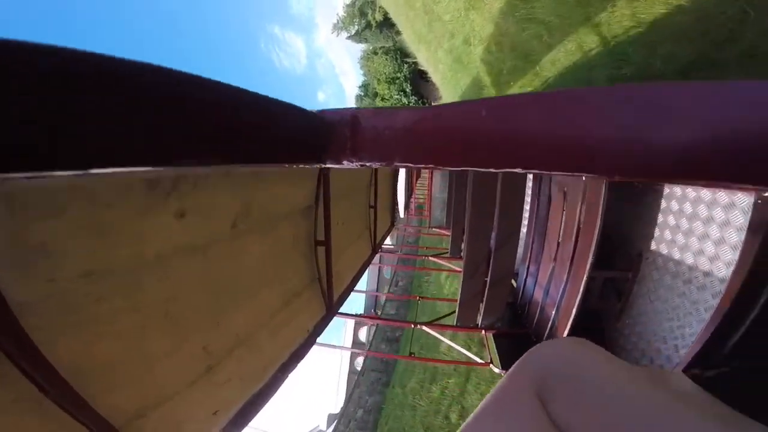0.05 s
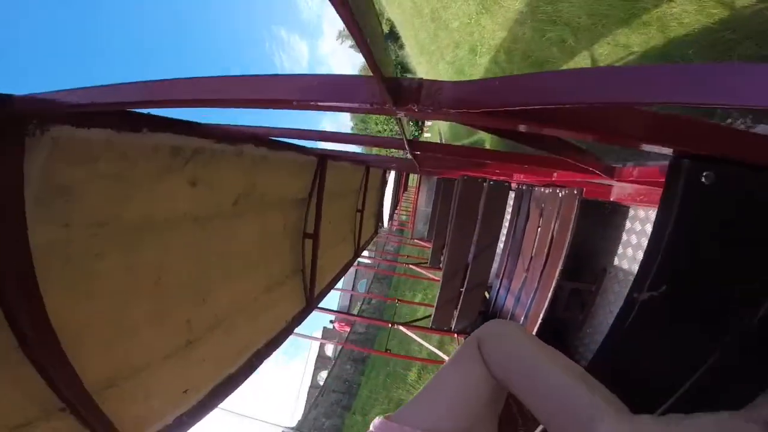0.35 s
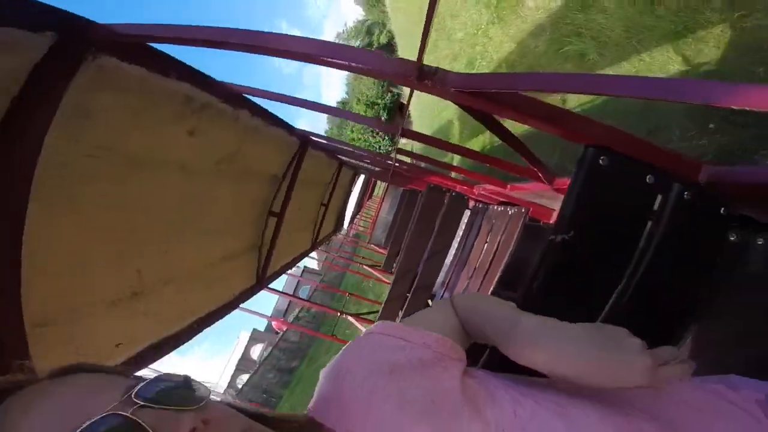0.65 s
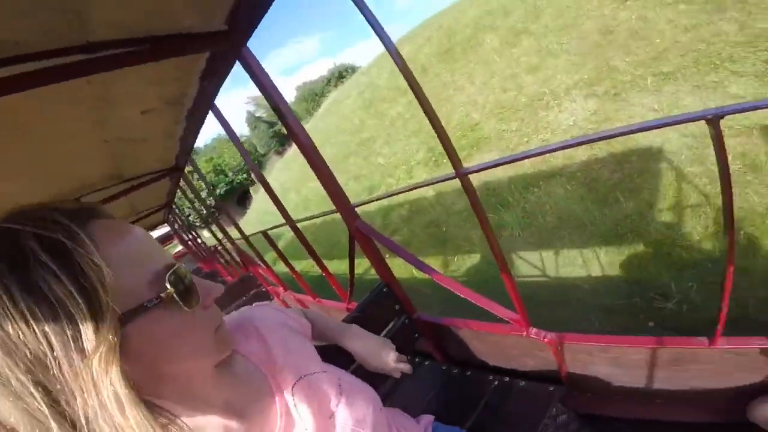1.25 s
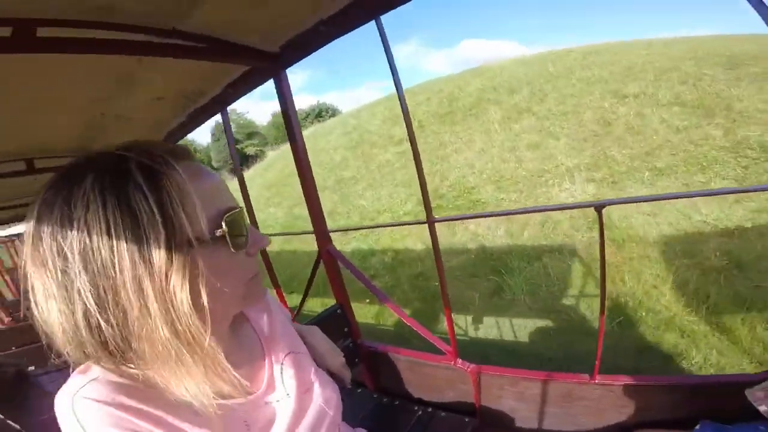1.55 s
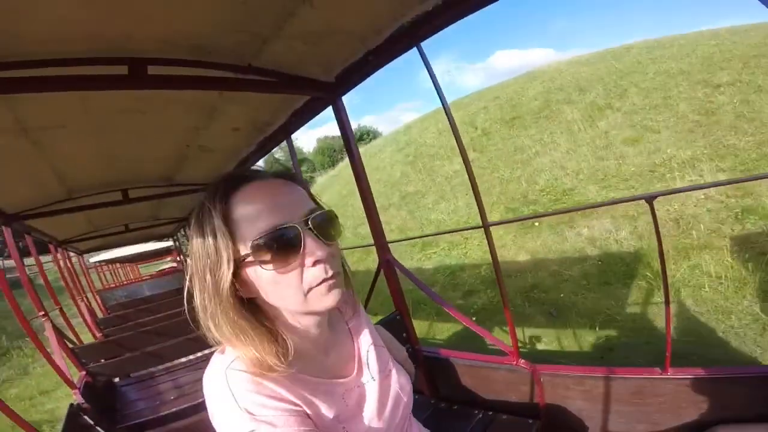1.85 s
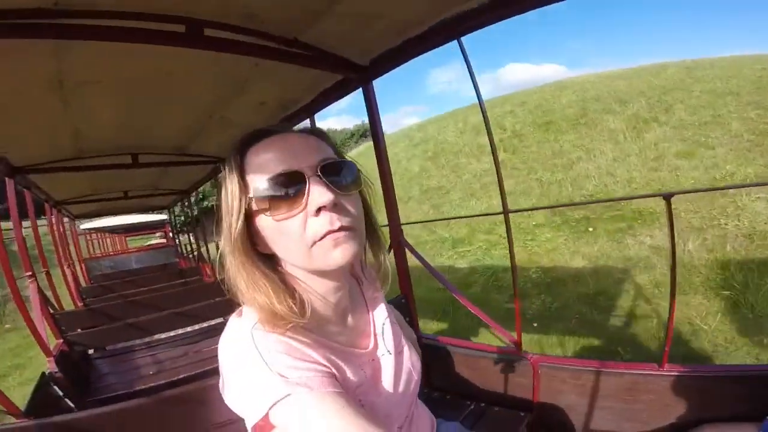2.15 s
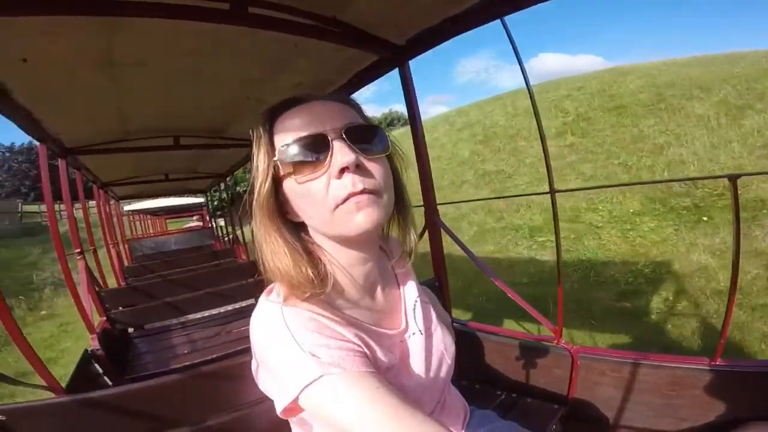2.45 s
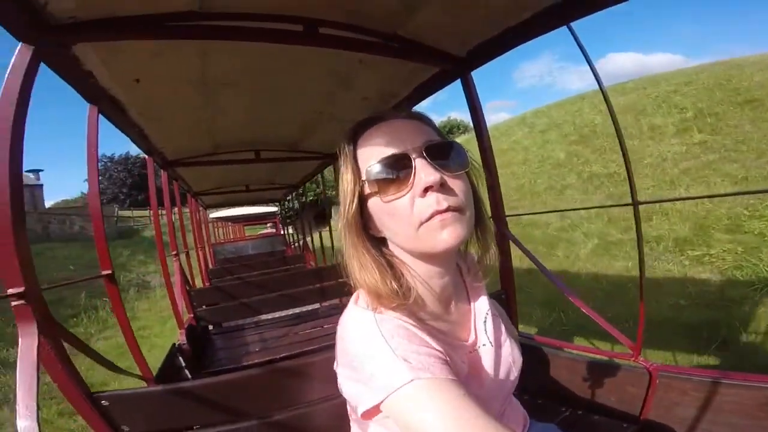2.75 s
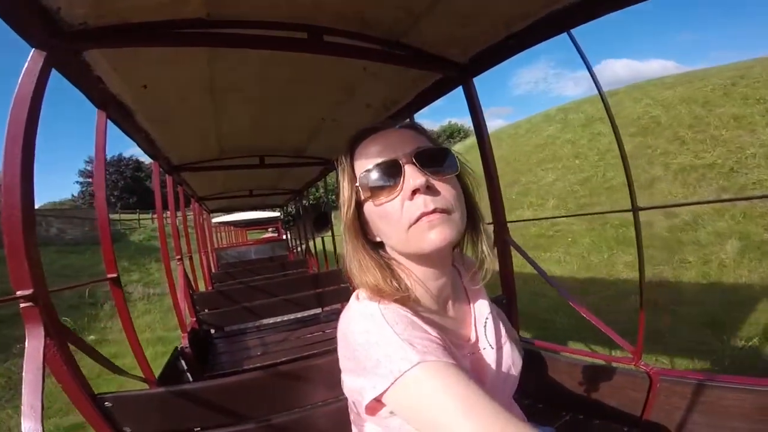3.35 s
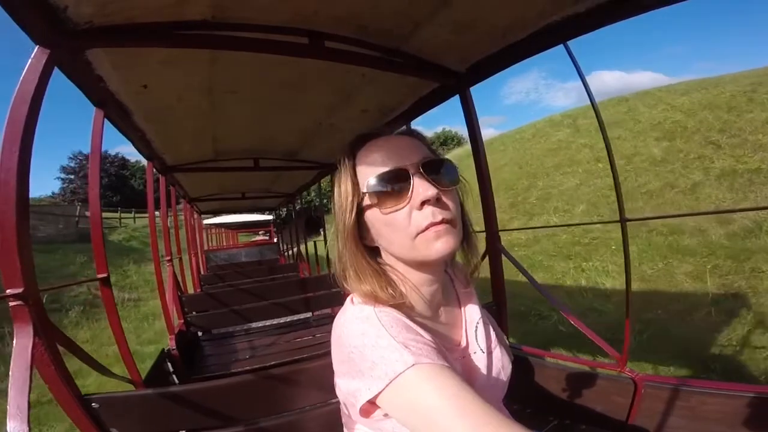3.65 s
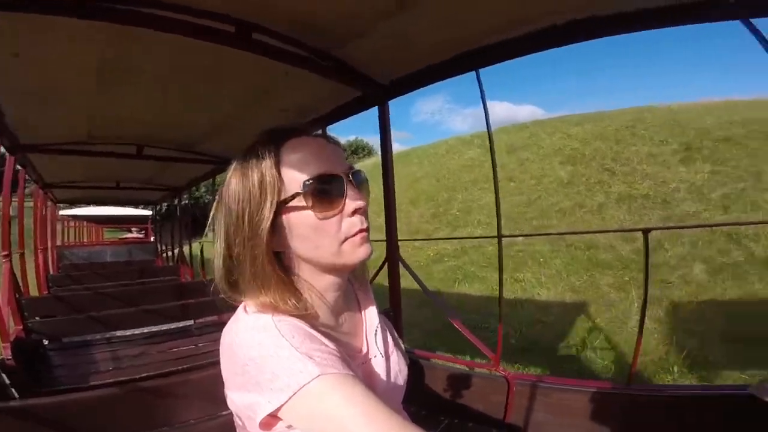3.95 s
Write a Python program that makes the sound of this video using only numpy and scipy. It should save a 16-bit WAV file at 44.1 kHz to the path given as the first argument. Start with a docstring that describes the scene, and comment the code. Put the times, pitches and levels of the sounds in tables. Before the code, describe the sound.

Small train wheels roar on the track as the open carriage booms, knocks and rattles.

```python
"""Wheels of a miniature train roar on the rails, heard from an open carriage. The carriage booms,
its frame throbs in the deep bass and wind buffets the microphone. Track bumps knock the wooden body,
clank the wheels and axles and rattle loose steel fittings. The frame groans once, small parts tick
and a rubbing flange makes a wheel sing briefly."""
import sys
import numpy as np
from scipy import signal
from scipy.fft import rfft, irfft, next_fast_len
from scipy.io import wavfile
from scipy.ndimage import uniform_filter1d, map_coordinates

SR = 44100
rng = np.random.default_rng(int(sys.argv[2]) if len(sys.argv) > 2 else 0)


def master(y):
    """Save y as 16-bit WAV."""
    cut = np.clip(np.atleast_2d(y).T, -1, 1)
    pcm = np.round(cut * 32767)  # scale
    wavfile.write(sys.argv[1], SR, pcm.astype(np.int16))


N = 176400


def amp(db):
    """Decibels to gain."""
    return 10 ** (np.asarray(db) / 20)


def unit(x):
    """Scale to rms 1."""
    return x / np.sqrt(np.mean(x ** 2) + 1e-20)


def clock():
    """Sample times in seconds."""
    return np.arange(N) / SR


def curve(rows):
    """Per-sample interpolation of (time_s, value) rows."""
    return np.interp(clock(), *np.transpose(rows))


def wobble(knots_per_s):
    """Smooth random curve."""
    return map_coordinates(rng.standard_normal(1024), [clock() * knots_per_s + 3], mode="wrap")


def filtered(x, response):
    """Apply a frequency response by FFT."""
    size = next_fast_len(N + SR // 2)
    return irfft(rfft(x, size) * response(np.fft.rfftfreq(size, 1 / SR)), size)[:N]


def colour(points):
    """Response through (freq_hz, gain_db) points on a log axis, rolled off below the first."""
    hz, db = np.transpose(points)
    return lambda f: amp(np.interp(np.log(f + 1), np.log(hz), db)) * np.minimum(f / hz[0], 1) ** 2


def resonances(modes):
    """Response of (freq_hz, width_hz, gain_db) modes, alternating in sign."""
    return lambda f: sum((-1) ** k * amp(db) * 1j * f * width / (hz * hz - f * f + 1j * f * width)
                         for k, (hz, width, db) in enumerate(modes))


def lowpassed(response, edge_hz, order):
    """A response rolled off above edge_hz."""
    return lambda f: response(f) / (1 + (f / edge_hz) ** order)


def pitch_window(f, centre_hz, spread_oct):
    """Gaussian weight on an octave axis."""
    return np.exp(-.5 * (np.log2(f / centre_hz) / spread_oct) ** 2)


def noise(response):
    """Coloured noise, rms 1."""
    return unit(filtered(rng.standard_normal(N), response))


def steadied(x, span_s):
    """Even out level swings slower than span_s."""
    power = uniform_filter1d(x * x, max(int(span_s * SR), 2))
    return x / np.sqrt(np.abs(power) + 1e-9)


def blow(start_s, rise_s, t60_s):
    """Impact envelope: linear rise, exponential decay."""
    age_s = clock() - start_s
    return np.clip(age_s / rise_s, 0, 1) * amp(-60 * np.maximum(age_s - rise_s, 0) / t60_s)


def rolling(roar_gain_db=0.5, ring_gain_db=-1, hiss_db=-47.5):
    """Wheels on rough rail: low roar, brighter rail ring, thin hiss following the ring."""
    # wheel roar and rail ring envelopes: time_s, level_db
    roar_levels = [(0, -23), (.09, -27), (.22, -22), (.5, -24), (.62, -21.5), (.9, -22.5), (1.4, -24),
                   (1.53, -20), (1.62, -26), (1.85, -23.5), (2.02, -23.5), (2.3, -26), (2.55, -23),
                   (2.85, -21.5), (3.1, -21), (3.25, -24.5), (3.42, -22.5), (3.6, -24), (3.95, -23.5)]
    ring_levels = [(0, -26.5), (.5, -25.5), (.6, -25), (.87, -25), (1.05, -23.5), (1.2, -21.5),
                   (1.32, -25.5), (1.62, -25.5), (1.8, -27), (2.1, -27.5), (2.42, -25), (2.62, -26),
                   (2.8, -22.5), (2.94, -27.5), (3.1, -23), (3.28, -25.5), (3.7, -26.5), (3.95, -24)]
    # roar, ring and hiss spectra: freq_hz, density_db
    roar_spectrum = [(70, -1.5), (180, -3.5), (222, -2), (243, -2.5), (268, -1.5), (305, 3), (345, -2.5),
                     (440, 1), (475, -2), (525, 1), (600, -5), (720, -22), (1100, -84), (2000, -120)]
    ring_spectrum = [(450, -39), (610, -6.5), (680, 2), (745, -1.5), (795, 2), (960, -1.5), (1030, -9.5),
                     (1170, -10.5), (1240, -8.5), (1330, -17), (1480, -19), (1650, -39), (2500, -84),
                     (4000, -120)]
    hiss_spectrum = [(700, -17), (1600, 6), (2000, 2.5), (2600, -2.5), (3200, -2), (4000, -8.5),
                     (4700, -12), (5200, -9), (5900, -14.5), (7000, -16.5), (9000, -26.5), (11000, -30.5),
                     (11800, -63.5)]
    roar = steadied(noise(colour(roar_spectrum)), span_s=0.11)
    roar *= amp(roar_gain_db + curve(roar_levels) + 0.47 * wobble(22.16))
    ring_db = curve(ring_levels)
    ring = steadied(noise(colour(ring_spectrum)), span_s=0.091)
    ring *= amp(ring_gain_db + ring_db + 1.3 * wobble(30.33))
    hiss = noise(colour(hiss_spectrum))
    hiss *= amp(hiss_db + 0.37 * (ring_db - ring_db.mean()) + 0.96 * wobble(40))
    return roar + ring + hiss


def carriage(rumble_gain_db=-1.5, boom_gain_db=-2.5):
    """The shaking carriage throbs, rumbles and booms in its low modes."""
    # carriage and frame modes: freq_hz, width_hz, gain_db
    throb_modes = [(25.45, 4, 1), (31.5, 16, -21.5)]
    rumble_modes = [(58.6, 9.1, 4), (62, 11, -2.5)]
    boom_modes = [(109, 3.7, -1), (132.2, 24, -7), (167, 9.1, -12)]
    # their envelopes: time_s, level_db
    throb_levels = [(0.0, -30.5), (0.32, -20.5), (1.48, -27.5), (1.52, -22.5), (2.07, -19), (2.11, -25),
                    (2.54, -12.5), (2.58, -26.5), (3.27, -16), (3.48, -32), (3.64, -17), (3.71, -31),
                    (3.75, -20.5), (3.9, -16)]
    rumble_levels = [(0, -25), (.3, -28), (.7, -29.5), (1.0, -26), (1.42, -29.5), (1.55, -20), (2.1, -21.5),
                     (2.25, -28.5), (2.5, -35), (2.7, -28), (3.2, -33.5), (3.36, -20), (3.48, -26.5),
                     (3.95, -27)]
    boom_levels = [(0, -34.5), (.14, -21), (.3, -27), (.6, -26.5), (.75, -30), (.95, -28), (1.25, -21),
                   (1.4, -27.5), (1.7, -24.5), (2.15, -23), (2.29, -17.5), (2.45, -31.5), (2.67, -19.5),
                   (2.9, -25), (3.3, -22.5), (3.95, -23.5)]

    def shake(modes, levels, edge_hz, span_s):
        vibration = noise(lowpassed(resonances(modes), edge_hz, order=8))
        return steadied(vibration, span_s) * amp(curve(levels))

    throb = shake(throb_modes, throb_levels, edge_hz=56, span_s=0.15)
    rumble = shake(rumble_modes, rumble_levels, edge_hz=180, span_s=0.36)
    boom = shake(boom_modes, boom_levels, edge_hz=217, span_s=0.11)
    return throb + amp(rumble_gain_db) * rumble + amp(boom_gain_db) * boom


def wind(level_db=-29.5, gust_db=2):
    """Draught through the open carriage buffets the microphone."""
    # buffeting spectrum: freq_hz, density_db
    spectrum = [(18, 0.5), (33, 0), (45, 4.5), (75, -6), (120, -15.5), (300, -23), (1000, -75.5),
                (3000, -120)]
    return noise(colour(spectrum)) * amp(level_db + gust_db * wobble(9))


def knocks():
    """Each bump shakes the wooden body's modes, most strongly near its own pitch."""
    # track bumps: start_s, level_db, pitch_hz, spread_oct, rise_s, t60_s
    bumps = [(0.114, -12.5, 520, 1.6, 0.024, 0.2), (0.339, -18, 400, 0.94, 0.039, .18),
             (.528, -20, 560, 0.84, 0.018, 0.34), (1.165, -19.5, 717, 0.22, 0.029, 0.36),
             (1.247, -20, 786, 0.55, 0.008, 0.11), (1.673, -16, 800, 1.1, 0.0072, 0.068),
             (1.992, -22, 1190, 0.28, 0.0036, 0.09), (2.009, -19.5, 433, 0.11, 0.015, 0.13),
             (2.775, -21.5, 835, 0.14, 0.019, 0.77), (3.02, -19, 430, 0.46, .015, 0.13),
             (3.09, -18.5, 690, 0.6, 0.013, 0.23), (3.779, -16, 370, 0.42, 0.012, 0.23),
             (3.918, -21, 480, 0.56, 0.012, 0.06)]
    # wooden body modes: freq_hz, width_hz, gain_db
    body_modes = [(225, 31, 2), (315, 35, -3.5), (451, 35, 1), (513.6, 36, 3.5), (664, 97, -4),
                  (870, 110, -9), (977, 35, -10), (1040, 70, -8.5), (1147, 67, -7), (1390, 78, -11.5)]
    out = np.zeros(N)
    body = noise(resonances(body_modes))
    for start_s, level_db, pitch_hz, spread_oct, rise_s, t60_s in bumps:
        band = lowpassed(lambda f: pitch_window(f + 1, pitch_hz, spread_oct), edge_hz=1500, order=8)
        wood = steadied(filtered(body, band), span_s=0.025)
        out += amp(level_db) * blow(start_s, rise_s, t60_s) * wood
    return out


def clacks(crack_gain_db=-1, ring_gain_db=2):
    """Hard contacts in the running gear: dry crack plus short metallic ring."""
    # gear contacts: start_s, level_db, rise_s, t60_s
    hits = [(0.115, -38, 0.0054, 0.26), (.160, -46, 0.0018, 0.18), (.212, -47, 0.015, .3),
            (0.545, -41, .003, 0.37), (1.245, -40.5, 0.0036, 0.13), (1.463, -41.5, .01, 0.092),
            (1.672, -34, 0.0018, 0.084), (1.992, -39.5, 0.0048, 0.21), (2.79, -47.5, 0.061, 0.33),
            (3.075, -43, 0.019, 0.49), (3.178, -42, 0.0082, 0.18), (3.476, -38, 0.0035, 0.2)]
    # crack spectrum: freq_hz, density_db
    crack_spectrum = [(500, -20), (1300, 6), (1800, 4.5), (2500, 0), (3300, 2), (4500, -15), (5600, -16),
                      (8000, -27), (10500, -49), (12000, -73.5)]
    # running gear modes: freq_hz, width_hz, gain_db
    gear_modes = [(1300, 100, 11), (1870, 140, -1), (2180, 140, 0.5), (2437, 37, -2), (2826, 70, -3),
                  (3280, 180, -6), (3700, 160, -10.5), (5260, 360, -8)]
    crack = amp(crack_gain_db) * noise(colour(crack_spectrum))
    ring = amp(ring_gain_db) * noise(lowpassed(resonances(gear_modes), edge_hz=7000, order=6))
    envelope = sum(amp(db) * blow(start_s, rise_s, t60_s) for start_s, db, rise_s, t60_s in hits)
    return (crack + ring) * envelope


def fittings(ring_gain_db=-3.5, crash_gain_db=-1, grit=0.29, taps_per_s=28, tap_db=-60.5, scatter_db=5):
    """Bursts of tiny contacts ring two loose steel fittings over a light, continual chatter."""
    # rattle bursts: start_s, level_db, rise_s, t60_s, large_share
    rattles = [(.119, -46.5, 0.0037, .12, 1), (.134, -43, 0.0058, 0.21, 0.9),
               (0.1591, -32.5, .0015, 0.047, 1), (.176, -49, .003, .07, 1), (0.207, -38, 0.0092, 0.15, 1),
               (.245, -47, 0.0074, 0.29, 1), (.364, -43.5, 0.0058, 0.16, 0.86),
               (0.545, -46, 0.0025, 0.25, 0.9), (.783, -51, 0.0053, 0.07, 0.9),
               (.857, -52, 0.0036, .07, 0.1), (1.246, -47.5, 0.0067, 0.056, 0.8),
               (1.672, -46, 0.0017, 0.088, 1), (1.947, -45, 0.0049, 0.13, 0),
               (2.138, -50, 0.0089, 0.081, 0.06), (2.467, -47, 0.013, 0.24, 0.3),
               (2.994, -43, 0.007, 0.14, 0), (3.041, -41, 0.0055, 0.28, 0), (3.148, -46.5, 0.0055, 0.26, 0),
               (3.182, -44.5, 0.011, 0.14, 0), (3.26, -50, 0.008, 0.14, 0.04),
               (3.343, -47, 0.0076, 0.13, 0), (3.4755, -45.5, 0.0017, 0.069, 0.3)]
    # steel fitting modes: freq_hz, width_hz, gain_db
    large_modes = [(2800, 90, 1), (3260, 60, -2), (4330, 110, -1), (5110, 70, 0), (5612, 50, -1),
                   (6330, 60, -3), (6650, 45, 0), (7010, 70, 0)]
    small_modes = [(3190, 45, -1), (3700, 35, -2), (4360, 40, -4), (4960, 30, 0), (5390, 45, 1),
                   (5900, 40, 1), (6190, 45, -1), (6445, 45, 0), (6960, 45, -3), (7615, 35, -6)]
    # contact spectrum: freq_hz, density_db
    contact_spectrum = [(1000, -12.5), (2600, -1), (3400, -1), (4500, -2), (5800, -4), (7100, -2.5),
                        (8000, -10), (10000, -20.5), (11500, -23.5), (13000, -43.5)]
    large_force, small_force = np.zeros((2, N))
    for start_s, level_db, rise_s, t60_s, large_share in rattles:
        burst = amp(level_db) * blow(start_s, rise_s, t60_s)
        large_force += burst * large_share
        small_force += burst * (1 - large_share)
    contacts = unit(rng.standard_normal(N) * np.exp(grit * wobble(900)))
    tap_onsets = rng.random(N) < taps_per_s / SR
    taps = tap_onsets * amp(tap_db + scatter_db * np.clip(rng.standard_normal(N), -2, 2))
    chatter = signal.fftconvolve(taps, blow(0, rise_s=0.0019, t60_s=0.055))[:N]

    def struck(force, response):
        return filtered(contacts * force, response) / np.std(filtered(contacts, response))

    ring = sum(struck(force + chatter / 2, lowpassed(resonances(modes), edge_hz=9000, order=10))
               for force, modes in [(large_force, large_modes), (small_force, small_modes)])
    crash = struck(large_force + small_force + chatter, colour(contact_spectrum))
    return amp(ring_gain_db) * ring + amp(crash_gain_db) * crash


def clanks():
    """A hard blow rings wheel and axle, most strongly in the modes near its own pitch."""
    # axle blows: start_s, level_db, pitch_hz, spread_oct, rise_s
    hits = [(.555, -16.5, 675, 0.074, 0.014), (1.672, -21.5, 1250, 0.078, 0.0017),
            (1.6725, -35, 2480, .08, 0.0018), (1.676, -21, 817, .08, 0.0029),
            (1.983, -19.5, 704, .06, 0.0047), (1.993, -21, 1100, 0.27, 0.0026)]
    # wheel and axle modes: freq_hz, gain_db, t60_s
    axle_modes = [(668, 6, 0.16), (725, 4.5, 0.22), (803, -2, 0.2), (925, 1, .12), (1050, -6, 0.12),
                  (1277, -2, 0.046), (1375, -3, 0.18), (1970, 1, .12), (2107, -3, .12), (2570, 3, 0.026),
                  (3150, -12, 0.089), (4200, -5, 0.052)]
    out = np.zeros(N)
    mode_hz, mode_db, mode_t60_s = np.transpose(axle_modes)
    for start_s, level_db, pitch_hz, spread_oct, rise_s in hits:
        gains = amp(mode_db) * pitch_window(mode_hz, pitch_hz, spread_oct)
        gains *= np.sqrt(2) / (np.linalg.norm(gains) + 1e-12)  # summed sines at rms 1
        phases = rng.random(len(axle_modes))
        for hz, gain, t60_s, phase in zip(mode_hz, gains, mode_t60_s, phases):
            partial = gain * np.sin(2 * np.pi * (hz * clock() + phase))
            out += amp(level_db) * blow(start_s, rise_s, t60_s) * partial
    return out


def groan(octave_db=-1, waver_hz=2.9):
    """The flexing frame groans: a short rising tone with its octave."""
    # frame flex: start_s, length_s, first_hz, last_hz, level_db
    flexes = [(0.686, 0.138, 106.4, 140, -22)]
    out = np.zeros(N)
    for start_s, length_s, first_hz, last_hz, level_db in flexes:
        progress = np.clip((clock() - start_s) / length_s, 0, 1)
        pitch_hz = first_hz + (last_hz - first_hz) * progress + waver_hz * wobble(60)
        phase = 2 * np.pi * np.cumsum(pitch_hz) / SR
        swell = np.sin(np.pi * progress)
        tone = swell * np.sin(phase) + amp(octave_db) * swell ** 2 * np.sin(2 * phase)
        out += amp(level_db) * np.sqrt(2) * tone
    return out


def ticks(rise_s=0.001, t60_s=0.028):
    """Small hard parts tick: brief, bright noise bursts."""
    # ticks: start_s, level_db
    hits = [(.879, -52), (1.007, -52), (1.121, -54), (2.2696, -51), (2.305, -55), (2.501, -56)]
    # tick spectrum: freq_hz, density_db
    spectrum = [(2500, -20), (5000, -5.5), (7000, 1.5), (8500, -3), (10000, -13.5), (12500, -16)]
    envelope = sum(amp(level_db) * blow(start_s, rise_s, t60_s) for start_s, level_db in hits)
    return noise(colour(spectrum)) * envelope


def wheel_song(waver_hz=32):
    """A flange rubs the rail; the wheel sings faintly at an unsteady pitch."""
    # flange rubs: start_s, length_s, pitch_hz, level_db
    rubs = [(2.686, 0.086, 1216, -39), (3.308, 0.092, 1247, -32), (3.529, 0.091, 1285, -31.5)]
    out = np.zeros(N)
    for start_s, length_s, pitch_hz, level_db in rubs:
        swell = np.sin(np.pi * np.clip((clock() - start_s) / length_s, 0, 1))
        phase = 2 * np.pi * np.cumsum(pitch_hz + waver_hz * wobble(150)) / SR
        out += amp(level_db) * swell * np.sin(phase)
    return out


def scene():
    """Mono mix at a seat in the carriage."""
    ride = rolling() + carriage() + groan()
    impacts = knocks() + clanks() + clacks() + fittings() + ticks()
    return (ride + impacts + wheel_song() + wind())[None]


def record(dry):
    """Steep low-pass band limit."""
    top_hz = 12800
    return filtered(dry[0], lambda f: 1 / (1 + (f / top_hz) ** 60))[None]


dry = scene()
out = record(dry)
master(out)
```